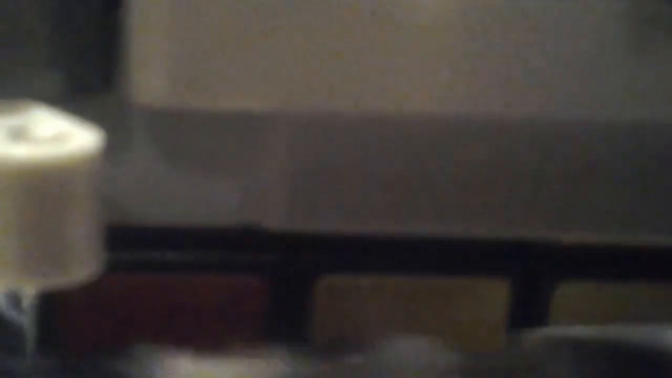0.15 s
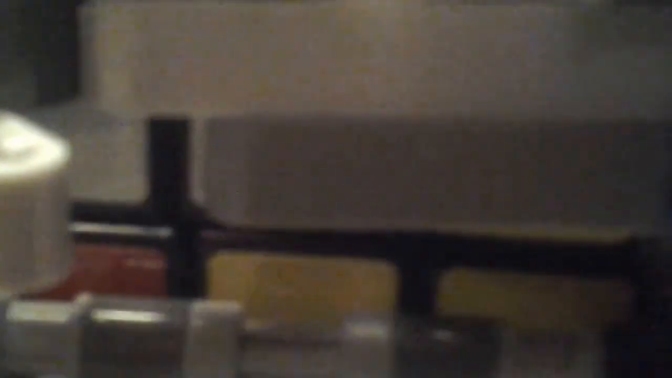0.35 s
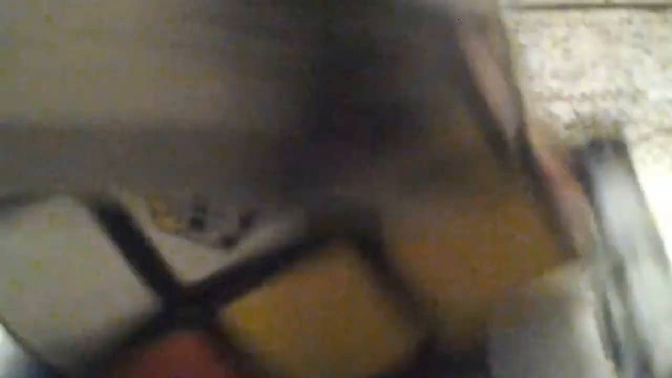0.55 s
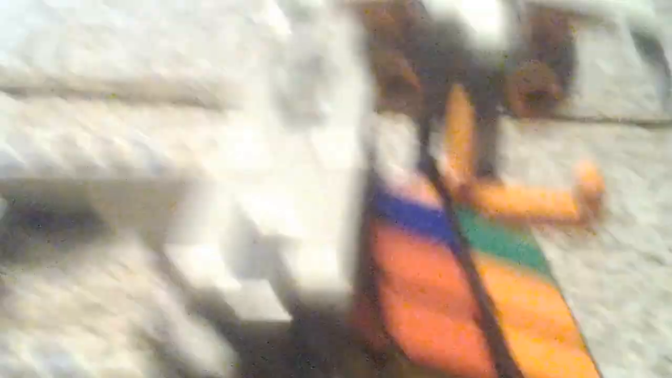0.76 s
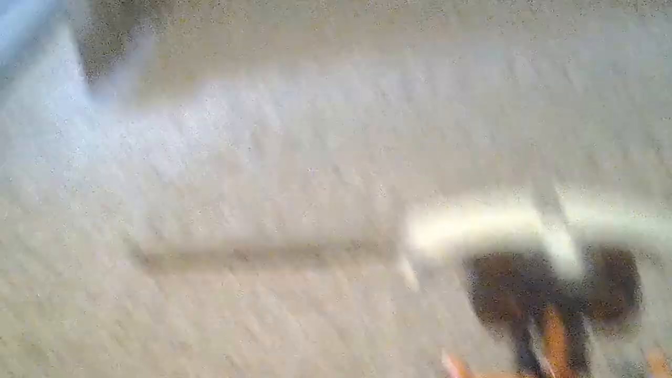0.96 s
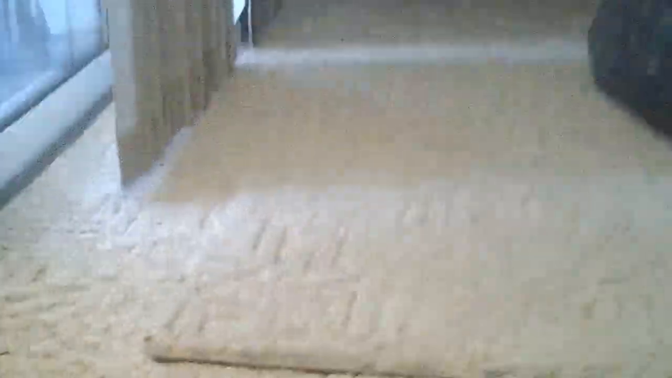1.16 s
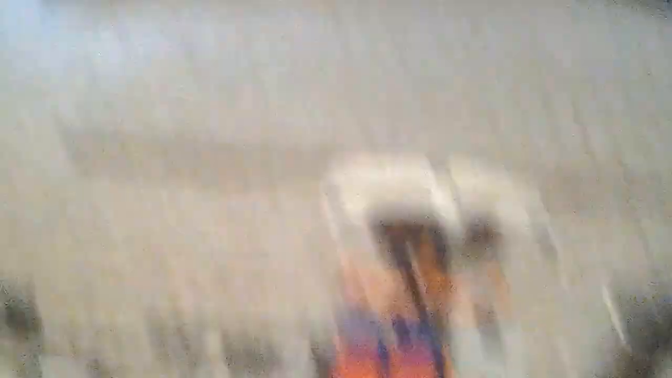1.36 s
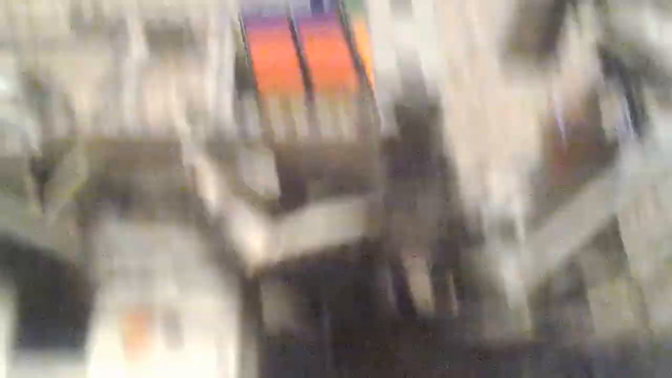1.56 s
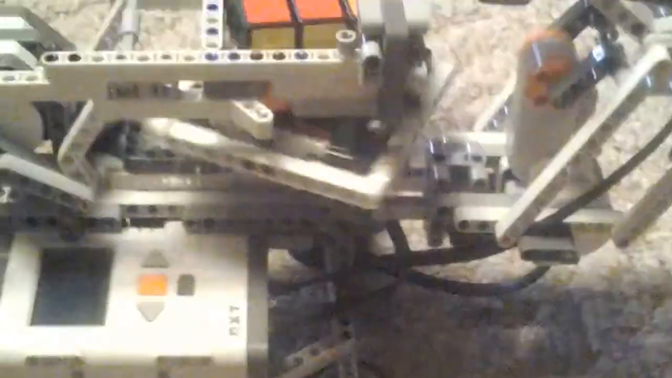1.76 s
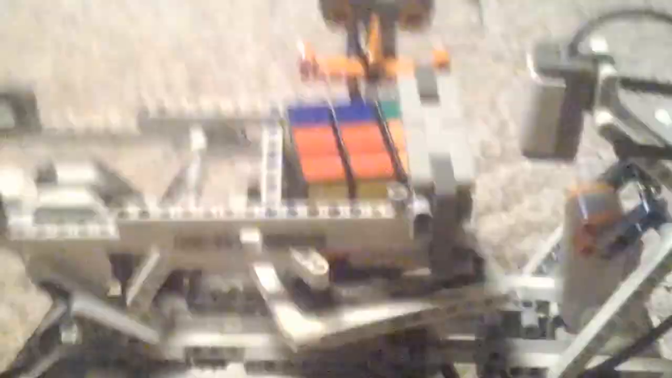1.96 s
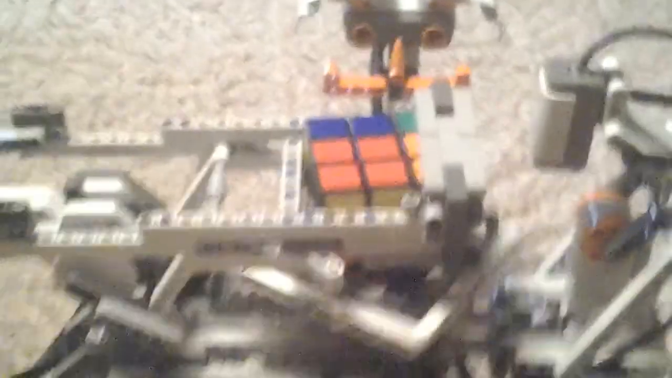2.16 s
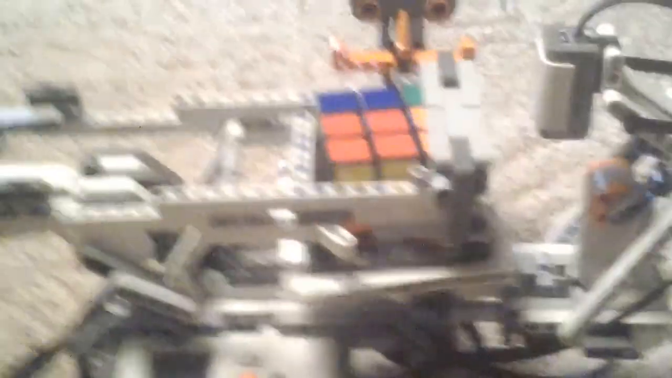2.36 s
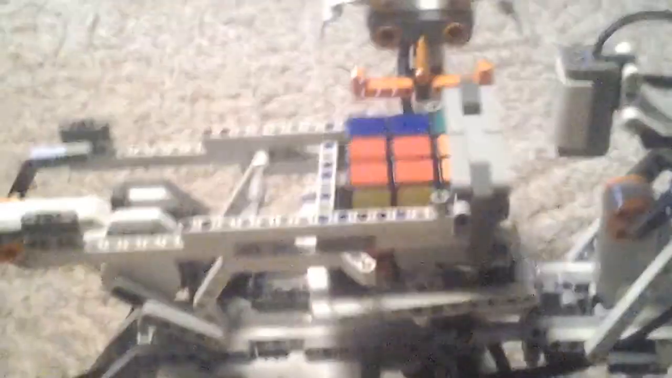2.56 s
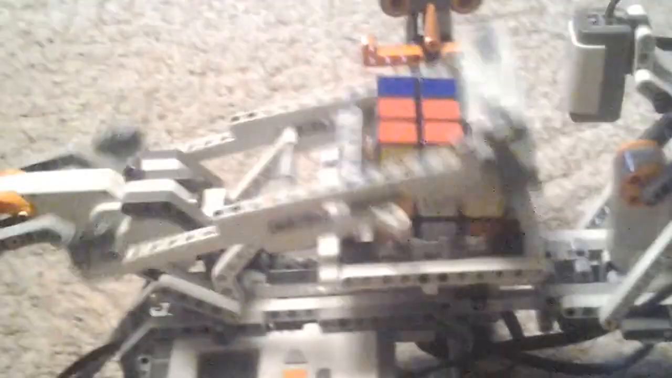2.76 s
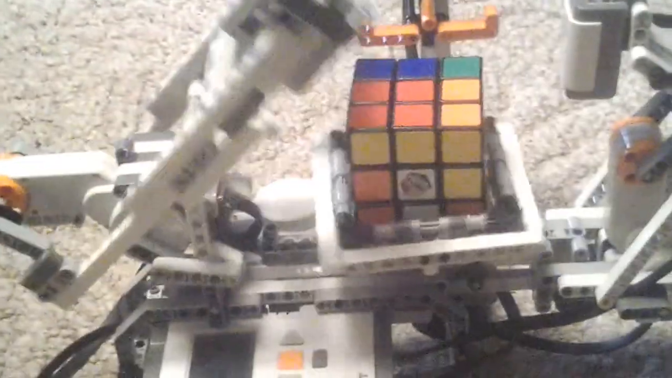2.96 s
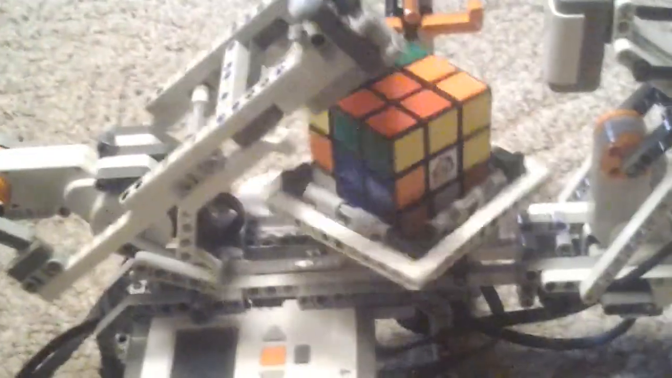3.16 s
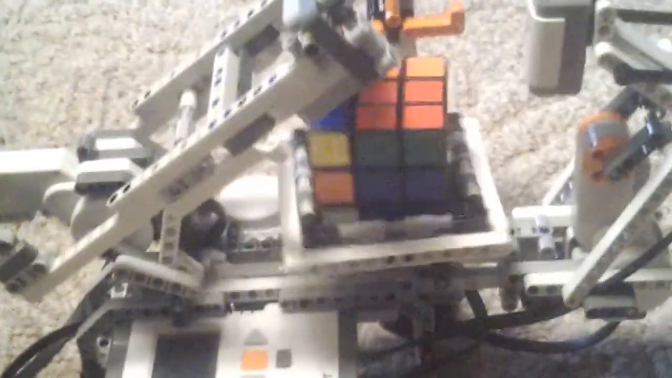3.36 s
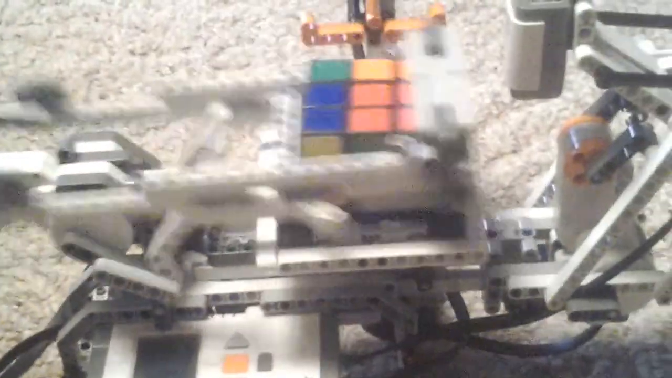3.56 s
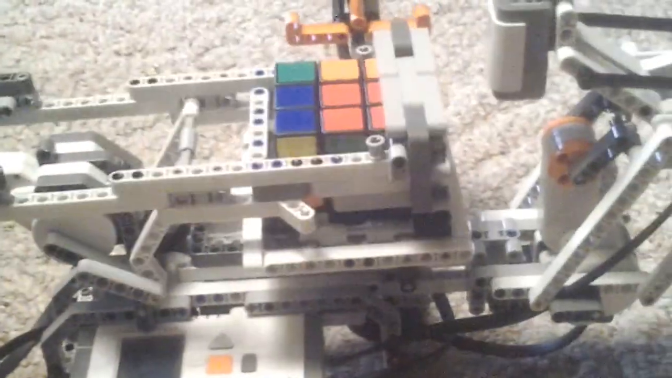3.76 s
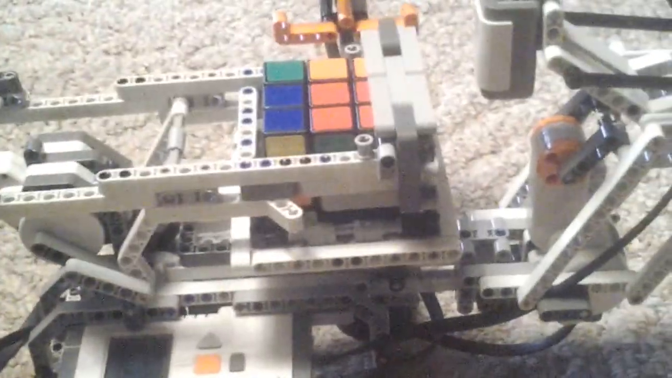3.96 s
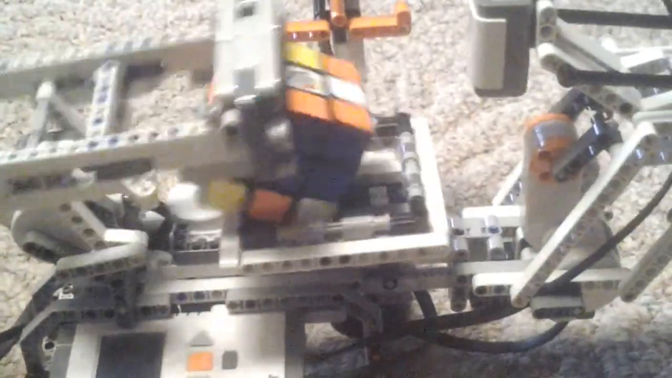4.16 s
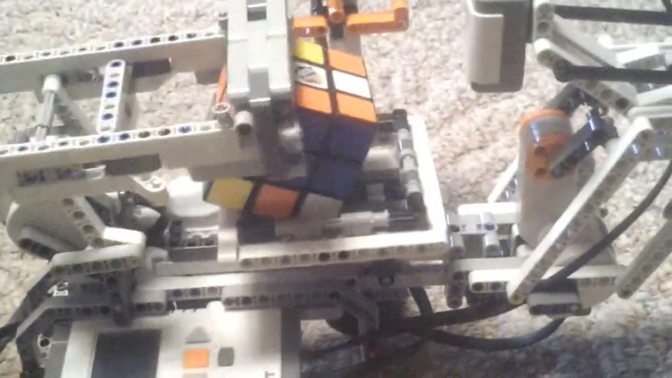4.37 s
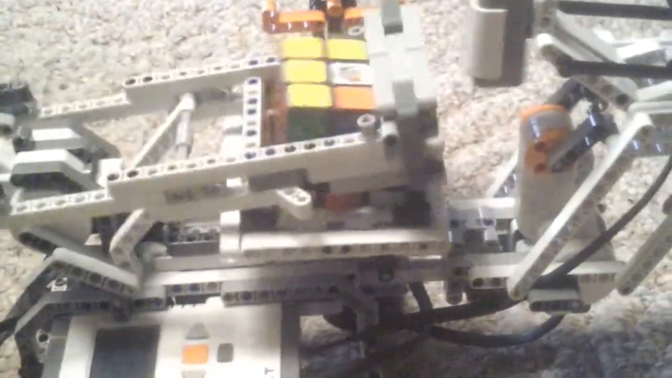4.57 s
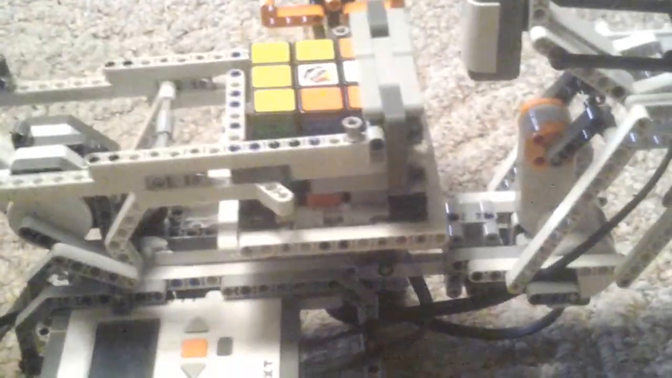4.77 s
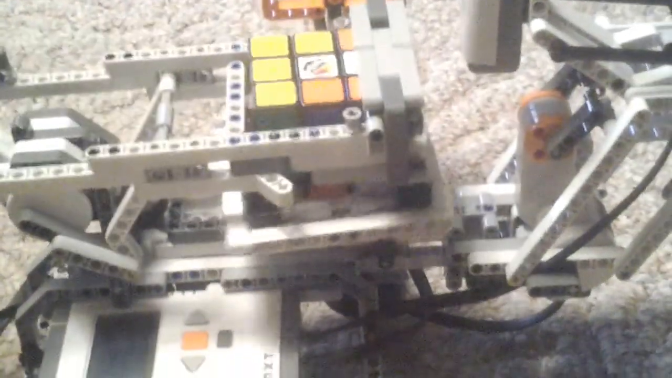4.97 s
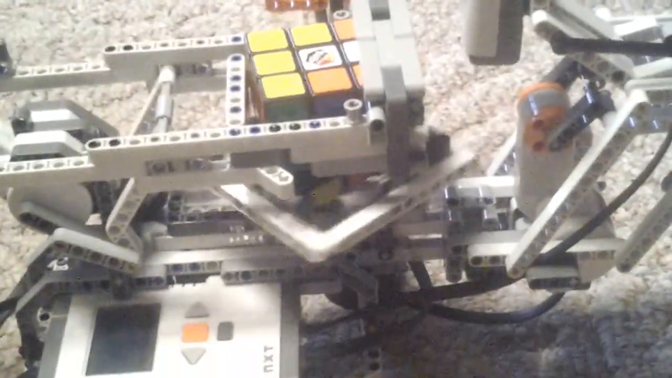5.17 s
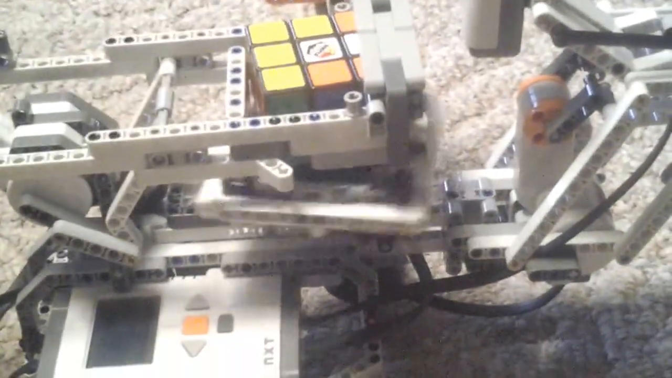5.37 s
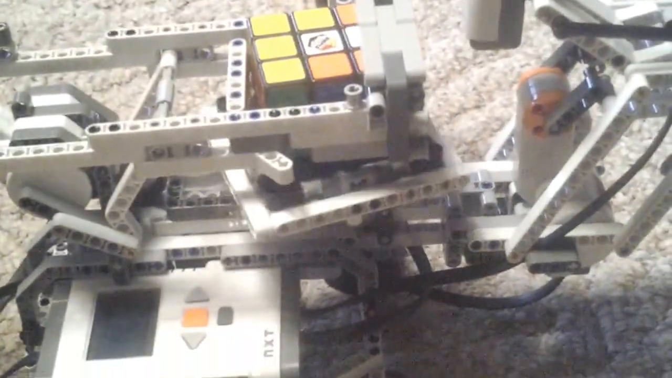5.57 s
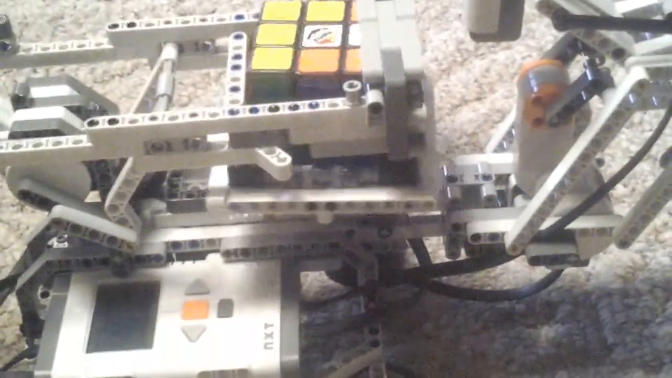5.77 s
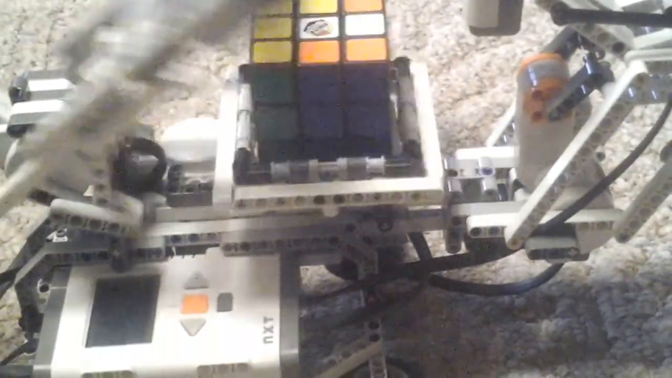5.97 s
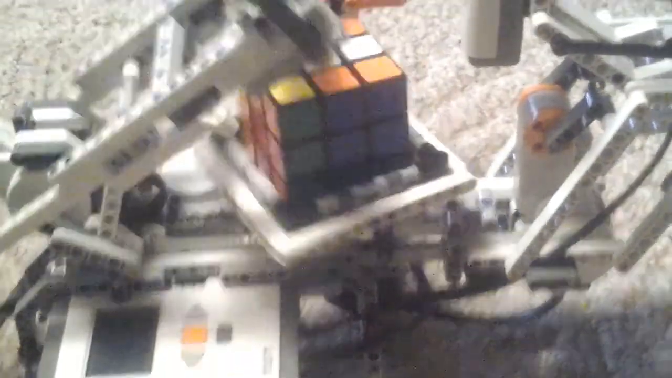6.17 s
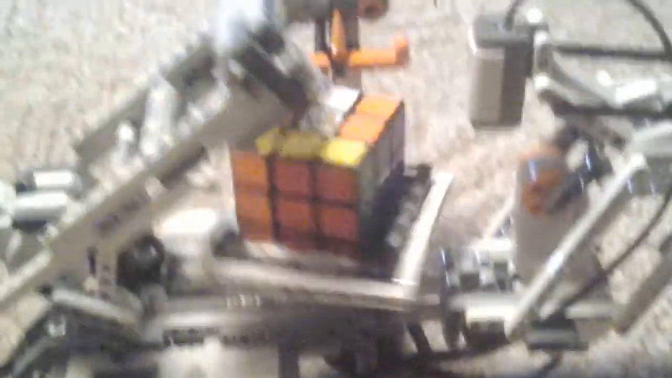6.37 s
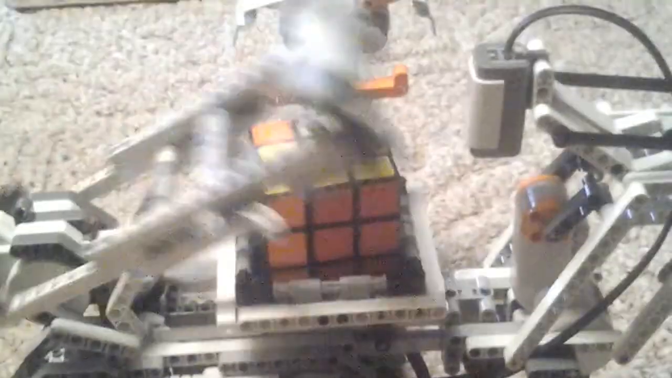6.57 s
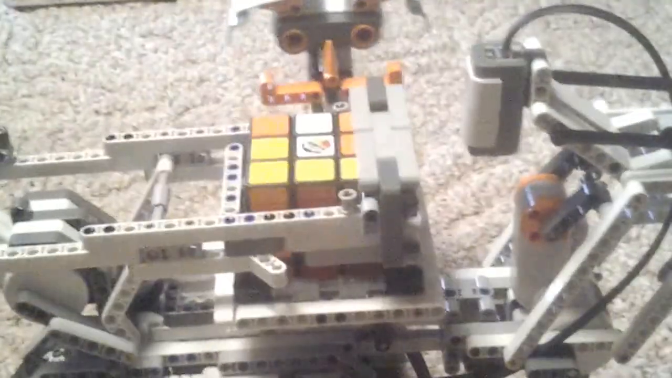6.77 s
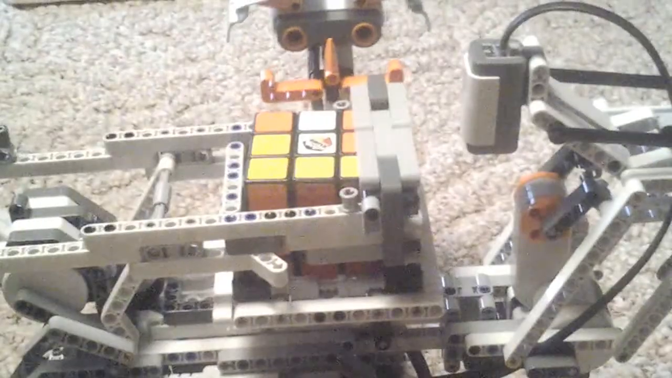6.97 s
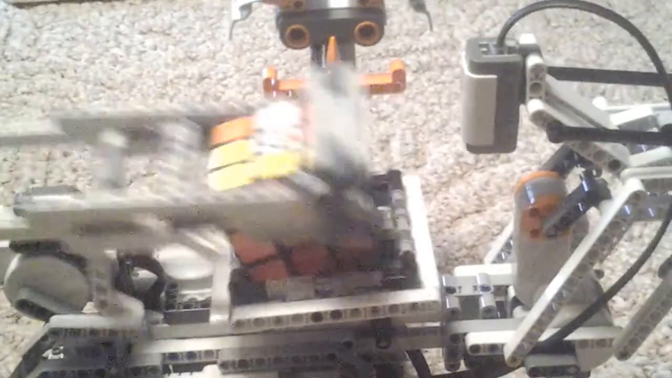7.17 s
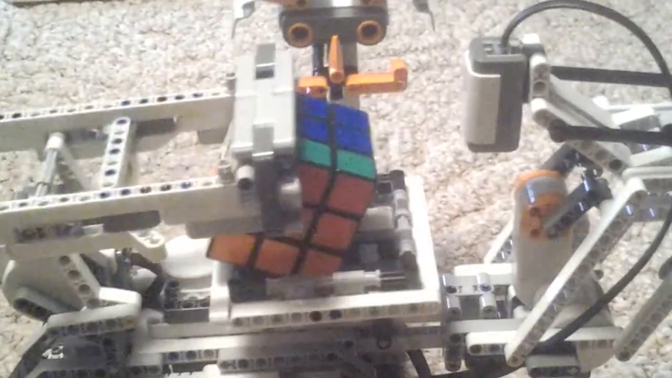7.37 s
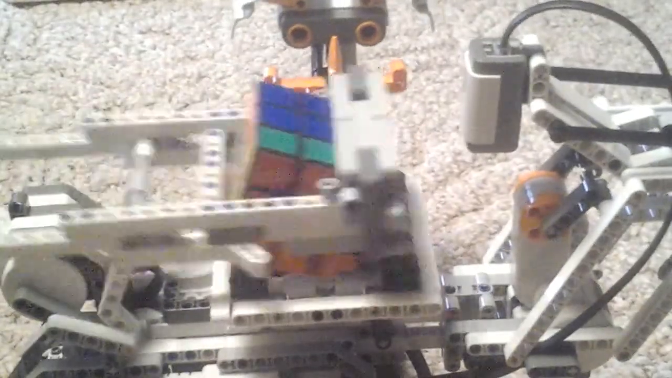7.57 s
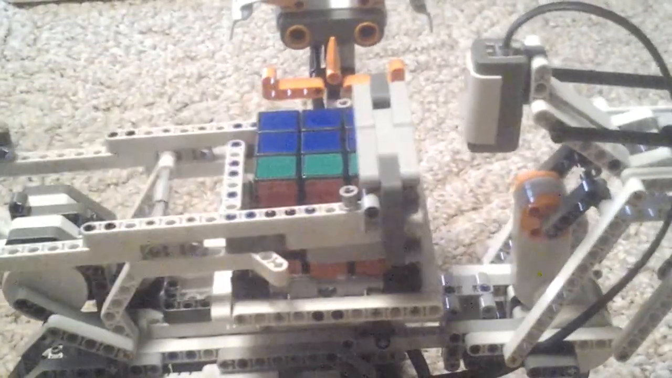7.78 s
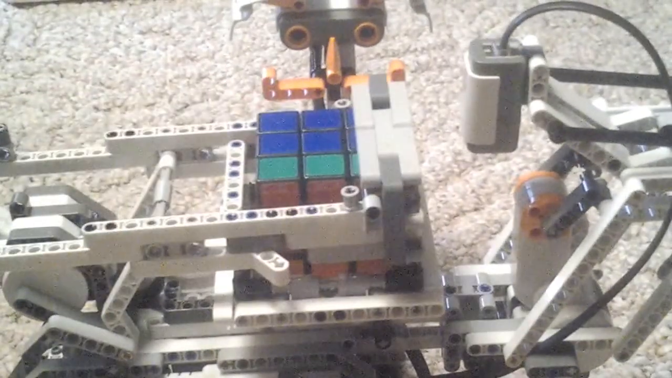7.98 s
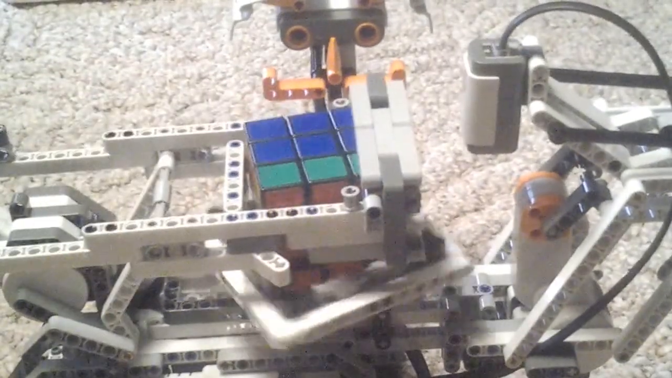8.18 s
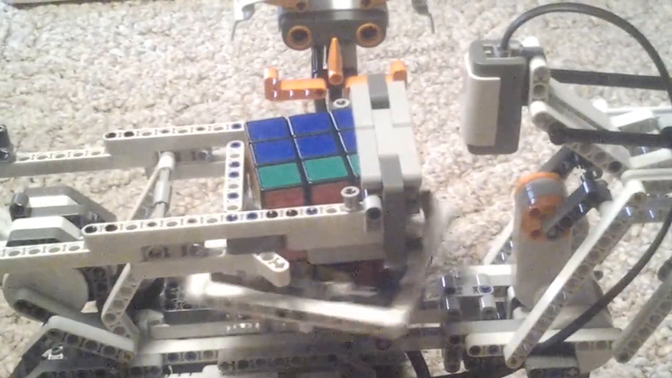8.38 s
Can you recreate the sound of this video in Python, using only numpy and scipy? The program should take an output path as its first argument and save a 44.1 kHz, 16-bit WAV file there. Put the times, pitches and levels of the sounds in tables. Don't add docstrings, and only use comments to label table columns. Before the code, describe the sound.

A plastic brick robot turns a puzzle cube on carpet, close to a small tinny microphone with a piercing ring. It opens with a very loud motor burst stopping almost at once, then small taps, a short whir near 0.5 s and a cluster of hard clacks and rattles from 0.6 to 1.3 s, boxed in. From 1.5 s the tone opens up: a gritty gear whine with wavering pitch runs to 2.4 s. A brief arm whir comes at 2.7 s, soft grinding around 3 s, then a sharp double clack at 3.55 s. Short whirs and snapping tumbles follow from 4 to 4.7 s. A throbbing whine fills 5.0 to 5.5 s, a lift follows at 5.8 s, then quiet creeping. Loud clacks land at 6.6 s, whirs and rattling at 7.1 to 7.8 s, and a final whine from 8.1 s is cut off. Thin hiss underneath, little room echo.

```python
import sys
import numpy as np
from scipy import signal
from scipy.fft import rfft, irfft, next_fast_len
from scipy.io import wavfile
from scipy.ndimage import uniform_filter1d

SR = 44100
rng = np.random.default_rng(int(sys.argv[2]) if len(sys.argv) > 2 else 0)


def inscribe(sig):
    pcm = np.round(np.clip(np.atleast_2d(sig).T, -1, 1) * 32767)
    wavfile.write(sys.argv[1], SR, pcm.astype(np.int16))


def to_linear_factor(level_db):
    exponent = np.asarray(level_db, float) / 20
    return 10 ** exponent


N = 371310
T = np.arange(N) / SR

# frequency in Hz, level in dB per Hz.
INSIDE_TONE = [(100, -43), (400, -27.5), (1350, -15.5), (2000, -17.5), (2600, -10), (3600, -5), (4450, -2),
               (5200, -6), (5800, -14), (6500, -12), (7200, -16.5), (11200, -28), (15000, -50)]
# frequency in Hz, level in dB per Hz.
OUTSIDE_TONE = [(150, -44), (700, -31.5), (1700, -20), (2150, -3.5), (2420, -1.5), (2870, -17), (3900, -6),
                (4450, -0.5), (5250, -4), (5900, -15), (6500, -9.5), (7300, -19), (10300, -25.5),
                (15000, -48.5)]
# frequency in Hz, level in dB per Hz.
HISS_TONE = [(40, -11.5), (150, -5), (400, 3), (700, -4), (1200, -11), (3000, -17.5), (4400, -26),
             (6000, -28), (14500, -18.5)]
BAND_EDGES_HZ = (1700, 3000, 5800)

ARM_OVERTONES_DB = [-6, 0, 2, -4, 3, 0, 2, -7, -4, -11, -10, -14]
TABLE_OVERTONES_DB = [1, 4, -4, -4, 3, -1, 4, -6, -3, -7, -8, -12]

# start in seconds, stop in seconds, level early in dB,
# level late in dB, warmth in dB (how the parts face the camera).
LIFTS = [
    (2.685, 2.825, -12, -13.5, 2.5),
    (5.785, 5.94, -16.5, -14, 0.5),
]
SWINGS = [
    (.435, .585, -6, -14, -6),
    (3.41, 3.5, -18, -21, -1),
    (3.99, 4.14, -18.5, -20.5, 0.5),
    (4.35, 4.44, -19.5, -25.5, -2),
    (6.5, 6.6, -17.5, -21, 0.5),
    (7.07, 7.23, -24, -22, -0.5),
    (7.44, 7.54, -23, -16, -5),
]
TWISTS = [
    (-.1, .045, 6.5, -19.5, -5.5),
    (1.5, 2.41, -20.5, -22, 1),
    (5.02, 5.49, -15, -20, -1),
    (8.14, 8.5, -16.5, -19, -1),
]
# slow creeps, take-ups just before the twists and a short rising move at 0.81 s.
CREEPS = [(.1, .22, -24.5, -27.5, -3.5), (.81, .885, -19.5, -8, -15.5), (1.325, 1.5, -39.5, -22, -9.5),
          (2.48, 2.62, -30.5, -37, 3.5), (2.93, 3.24, -25, -30.5, -2.5), (3.245, 3.39, -14, -35, -4),
          (4.915, 5.02, -30, -23, -4.5), (5.6, 5.74, -29.5, -38, 2.5), (6.02, 6.2, -25, -25.5, -3.5),
          (6.23, 6.46, -25, -31, -3.5), (8.0, 8.14, -30, -23, -5.5)]
TUMBLES = [(.3, .43, -50, -51, 5.5), (.6, .76, -28, -39.5, 6), (.895, 1.035, -20, -22.5, -5),
           (1.065, 1.14, -16, -23.5, -8.5), (1.19, 1.29, -31.5, -39.5, 0), (3.5, 3.56, -20.5, -12, -0.5),
           (4.15, 4.3, -25, -46.5, 2.5), (4.44, 4.55, -13, -19.5, -5.5), (4.57, 4.67, -24.5, -27.5, -2),
           (6.6, 6.67, -22, -16.5, -2), (7.24, 7.4, -23, -46.5, 0), (7.55, 7.78, -21, -28, -4)]
# moves, start below full level in dB, attack in seconds,
# stop in dB per second, level under 1.7 kHz in dB, level at 1.7-3 kHz in dB, level over the top edge in dB.
JOBS = [
    (LIFTS, 20, 0.042, 355, -22.5, -7.5, -9),
    (SWINGS, 28, 0.018, 860, -21.5, -5, -7),
    (TWISTS, 6.5, 0.011, 216, -17.5, -3.5, -10),
    (CREEPS, 12.1, 0.032, 240, -16, 1.5, -10),
    (TUMBLES, 4.2, 0.045, 350, -15.5, -4, -9),
]

ARM_CLEAN = (.15, .7, .45)
# time in seconds, tooth rate in Hz.
TWIST_SPEED = [
    [(0, 750), (.06, 738)],
    [(1.472, 782), (1.7, 785), (1.82, 800), (1.93, 835), (2.03, 830), (2.12, 772), (2.2, 772), (2.3, 815),
     (2.44, 820)],
    [(5.008, 790), (5.15, 778), (5.28, 742), (5.4, 762), (5.53, 762)],
    [(8.143, 830), (8.25, 825), (8.42, 830)],
]
RUNOUT = [.5, .45, 1, 1]

# time in seconds, peak in dB, body under 1.7 kHz in dB.
SNAPS = [(.299, -24.5, -14), (.3292, -24.5, -23), (.3706, -18, -40), (.408, -26, -13), (.9204, 0.5, -30.5),
         (1.335, -23.5, -9), (1.6635, -5, -16), (2.7053, -16, -25), (2.949, -16.5, -13), (3.5248, -2, -14),
         (3.5573, 4.5, -19.5), (3.776, -37, -10), (4.1839, -16, -8), (4.2597, -17.5, -33),
         (4.3534, -21.5, -24), (4.4461, -1, -18.5), (4.4692, -1.5, -20), (4.551, 0, -13.5),
         (5.8375, -4, -22.5), (6.0405, -12.5, -21), (6.6458, 2, -31), (7.285, -8, -16),
         (7.5438, -4.5, -14.5), (7.65, -8, -21)]
CLACKS = [(.5949, -6, -37), (.6471, 4.5, -24.5), (.807, -14.5, -40), (.8395, -1.5, -43),
          (1.2804, -15.5, -15), (2.6838, -17, -41), (3.017, -13, -9.5), (3.2465, -6, -32),
          (3.506, -12, -10), (3.7397, -24, -32), (3.8171, -26, -25), (4.2418, -16.5, -17),
          (4.4101, -8, -49), (4.59, -19, -10), (4.8005, -49.5, -12), (5.7923, -14, -32),
          (6.1392, -13, -10.5), (6.56, -6.5, -31), (6.6134, -0.5, -19.5), (6.7774, -16, -34),
          (6.8177, -26.5, -14), (6.8682, -32, -20), (7.2248, -9.5, -37), (7.445, -24, -30),
          (7.5033, -4.5, -27), (7.5735, 0, -16.5), (7.996, -36, -33), (8.1437, -1.5, -43)]
TAPS = [(.1133, -17, -14), (.147, -11, -15.5), (.3894, -21.5, -17.5), (.61, -7, -27), (.691, -12.5, -38),
        (.7355, -10.5, -15.5), (.761, -14.5, -15.5), (.9572, 1, -18), (.9756, -0.5, -29),
        (1.0208, -2.5, -25), (1.075, -13, -37), (1.0952, -4, -51), (1.622, -14, -2.5), (3.4311, -12, -28),
        (3.692, -23, -19), (6.7186, -17.5, -15), (7.326, -11, -18.5), (7.6146, -5, -33), (7.6965, -7, -16)]
# hits, snap in the top band in dB, time in seconds for the ring to fall 60 dB.
HITS = [
    (SNAPS, -9, 0.05),
    (CLACKS, -15.5, 0.067),
    (TAPS, -29, 0.051),
]
# time in seconds, peak in dB, centre in Hz.
KNOCKS = [(1.078, -29.5, 284), (1.191, -37, 378), (1.233, -27.5, 470), (1.612, -34, 570), (1.727, -27, 520),
          (1.969, -37, 412), (3.549, -40.5, 530), (4.461, -34, 430), (4.55, -66, 375), (6.637, -36, 473),
          (7.57, -38.5, 530)]

TEETH = 40
PULL_BACK_S = 1.5
RING_HZ, RING_WIDTH_HZ, RING_DB = 4460, 150, 0
SWITCH_DB_PER_S, COAST_DB, COAST_DB_PER_S, STILL_DB = 1805, -11, 134, -73.5
WARMTH_IN_BODY = .7
RATTLE_DB, RATTLE_PER_S = 3.0, 70
LIFT_SPIN, SWING_SPIN = (770, .04), (748, .066)
SPIN_SHORT_HZ, BRAKE_HZ, BRAKE_S, OVERRUN_S = 265, 40, .04, .02
ARM_CLEAN_S = .05
LOADED_HZ, LOADED_CLEAN, CLEAN_LOST_PER_HZ = 750, .7, .0046


def contour(table, hz):
    points_hz, db = np.transpose(table)
    return to_linear_factor(np.interp(np.log(np.maximum(hz, 1.)), np.log(points_hz), db))


def colour(x, table):
    cepstrum = irfft(np.log(contour(table, np.fft.rfftfreq(2048, 1 / SR))))
    cepstrum[1:1024] *= 2
    cepstrum[1025:] = 0
    response = irfft(np.exp(rfft(cepstrum)))[:1024]
    return signal.oaconvolve(x, response)[:N]


def heard(x):
    out = np.clip((T - PULL_BACK_S) / 0.1, 0, 1)
    ring = signal.lfilter(*signal.iirpeak(RING_HZ, RING_HZ / RING_WIDTH_HZ, fs=SR), x)
    x = x + to_linear_factor(RING_DB) * ring
    near = colour(x, INSIDE_TONE)
    far = colour(x, OUTSIDE_TONE)
    return (1 - out) * near / near.std() + out * far / far.std()


def split(x):
    size = next_fast_len(N)
    spectrum, hz = rfft(x, size), np.fft.rfftfreq(size, 1 / SR)
    lows = [1 / (1 + (hz / edge) ** 16) for edge in BAND_EDGES_HZ]
    shares = np.diff([0 * hz, *lows, 0 * hz + 1], axis=0)
    return [irfft(spectrum * share, size)[:N] for share in shares]


def walk(rate):
    k = int(SR / rate)
    steps = np.repeat(rng.standard_normal(N // k + 1), k)
    return 1.21 * uniform_filter1d(uniform_filter1d(steps, k), k)[:N]


def motor_speeds():
    for curve, runout in zip(TWIST_SPEED, RUNOUT):
        t = T[int(curve[0][0] * SR):int(curve[-1][0] * SR)]
        hz = np.interp(t, *np.transpose(curve))
        yield t, hz, LOADED_CLEAN - CLEAN_LOST_PER_HZ * (hz - LOADED_HZ), runout
    for moves, (full_hz, spin_s) in ((LIFTS, LIFT_SPIN), (SWINGS, SWING_SPIN)):
        for on, off, *_ in moves:
            t = T[int(on * SR):int((off + OVERRUN_S) * SR)]
            spin_up = SPIN_SHORT_HZ * np.exp((on - t) / spin_s)
            brake = BRAKE_HZ * np.clip((t - off) / BRAKE_S + .5, 0, 1)
            clean = np.interp(t, (on, on + ARM_CLEAN_S, off + OVERRUN_S), ARM_CLEAN)
            yield t, full_hz - spin_up - brake, clean, 0


def whine(wobble=.016, jitter=.005, flicker_db=3.0, fade_s=.012):
    out, clean, swing, drift = np.zeros(N), np.zeros(N), np.zeros(N), walk(260)
    flicker = [.9 * walk(130) + .55 * walk(25) for _ in ARM_OVERTONES_DB]
    for t, tooth_hz, share, runout in motor_speeds():
        table = runout > 0
        start = round(t[0] * SR)
        at = slice(start, start + len(t))
        edge = np.clip(np.minimum(t - t[0], t[-1] - t) / fade_s, 0, 1)
        clean[at] = edge * share * (.66 if table else .9)
        turns = np.cumsum(tooth_hz) / SR / TEETH
        swing[at] = runout * edge * np.sin(2 * np.pi * turns + 1.27)
        uneven = 1 + wobble * swing[at] + jitter * (1.27 + 2 * table) * drift[at]
        phase = 2 * np.pi * np.cumsum(tooth_hz * uneven) / SR
        strength = 2 * np.sqrt(tooth_hz / SR)
        depth_db = (1.18 + .5 * table) * flicker_db
        for k, db in enumerate(TABLE_OVERTONES_DB if table else ARM_OVERTONES_DB, 1):
            level = to_linear_factor(db + depth_db * flicker[k - 1][at])
            out[at] += strength * level * np.sin(k * phase + k * k)
    return out, clean, swing


def effort():
    power = np.full((4, N), to_linear_factor(2 * STILL_DB))
    rattle_db = RATTLE_DB * np.minimum(walk(RATTLE_PER_S), .7)
    for moves, start_db, attack_s, stop_db, body_db, low_db, snap_db in JOBS:
        for on, off, early_db, late_db, warm_db in moves:
            at = slice(max(int((on - .05) * SR), 0), int((off + .5) * SR))
            since, after = T[at] - on, np.maximum(T[at] - off, 0)
            db = np.interp(T[at], (on, off), (early_db, late_db))
            db -= start_db * np.exp(-np.maximum(since, 0) / attack_s)
            db += SWITCH_DB_PER_S * np.minimum(since, 0)
            db -= np.minimum(stop_db * after, COAST_DB_PER_S * after - COAST_DB)
            if moves == TUMBLES:
                db += rattle_db[at]
            tint_db = np.array([body_db + WARMTH_IN_BODY * warm_db, low_db + warm_db, 0, snap_db])
            power[:, at] += to_linear_factor(2 * tint_db)[:, None] * to_linear_factor(2 * db)
    return np.sqrt(power)


def gears(tick_db=1.5, flutter_db=1.5, throb_db=.6, swing_db=2.5):
    tone, clean, swing = whine()
    ticks = (rng.random(N) < .25) * rng.standard_normal(N) * to_linear_factor(tick_db * rng.exponential(size=N))
    force = np.sqrt(clean) * tone + np.sqrt(1 - clean) * ticks / ticks.std()
    throb = to_linear_factor(throb_db * walk(45) + swing_db * swing)
    out = 0
    for band, gain in zip(split(heard(force)), effort()):
        even = band / np.sqrt(uniform_filter1d(band ** 2, SR // 8))
        out = out + even * gain * throb * to_linear_factor(flutter_db * walk(130))
    return out


def clacks(tail_db=-7.0, crack_s=.002):
    out, t = np.zeros(N + 8192), T[:8192]
    low, middle, upper, top = split(heard(rng.standard_normal(N)))
    body, core, snap = (b / np.sqrt(uniform_filter1d(b ** 2, 160)) for b in (low, middle + upper, top))
    for hits, snap_db, t60 in HITS:
        ring = to_linear_factor(tail_db) * to_linear_factor(-60 * t / np.clip(t60, .01, .2))
        shape = (1 - np.exp(-t / .0004)) * (np.exp(-t / crack_s) + ring)
        for s, db, body_db in hits:
            i = int(s * SR)
            at = (i + np.arange(len(t))) % N
            noise = core[at] + to_linear_factor(body_db) * body[at] + to_linear_factor(snap_db) * snap[at]
            out[i:i + len(t)] += to_linear_factor(min(db, 6) - 5.0) * shape * noise
    return out[:N]


def knocks(t60=0.13):
    out, t = np.zeros(N), T[:8192]
    noise = rng.standard_normal((len(KNOCKS), 8192))
    for (s, db, hz), n in zip(KNOCKS, noise):
        thud = signal.lfilter(*signal.butter(1, [0.69 * hz, 1.18 * hz], "band", fs=SR), n)
        shape = to_linear_factor(db - 60 * t / t60) * (1 - np.exp(-t / 0.0044))
        out[int(s * SR):][:len(t)] += shape * thud / thud.std()
    return out


def room_tail(robot):
    t = T[:SR // 3]
    tail = rng.standard_normal(len(t)) * to_linear_factor(-60 * t / 0.26) * (t > .004)
    return signal.oaconvolve(robot, tail / np.sqrt(np.sum(tail ** 2)))[:N]


def microphone_hiss():
    hiss = colour(rng.standard_normal(N), HISS_TONE)
    return to_linear_factor(-55) * hiss / hiss.std()


def scene():
    robot = gears() + clacks() + knocks()
    mono = robot + to_linear_factor(-23.0) * room_tail(robot) + microphone_hiss()
    return np.array([mono, mono])


def drop_faint_bands(x, bass_db=-42.0, treble_db=-43.0, top_hz=15500):
    hz, _, spec = signal.stft(x, SR, nperseg=1024)
    power = uniform_filter1d(abs(spec) ** 2, size=3, axis=1)
    band = np.where(hz < 1500, hz // 86, 100 + hz // 260)
    keep = np.empty(spec.shape, bool)
    for b in np.unique(band):
        margin = to_linear_factor(bass_db if b < 100 else treble_db) ** 2
        keep[band == b] = 2 * power[band == b].mean(axis=0) > margin * power.sum(axis=0)
    return signal.istft(spec * keep * (hz < top_hz)[:, None], SR, nperseg=1024)[1][:N]


def top_cut(x):
    return signal.sosfilt(signal.butter(12, 15610, fs=SR, output="sos"), x)


def record(dry):
    flattened = np.clip(dry[0], -1, 1)
    no_bass = signal.lfilter(*signal.butter(2, 150, "high", fs=SR), flattened)
    mono = drop_faint_bands(no_bass)
    return top_cut(np.clip([mono, mono], -1, 1))


dry = scene()
out = record(dry)
inscribe(out)
```